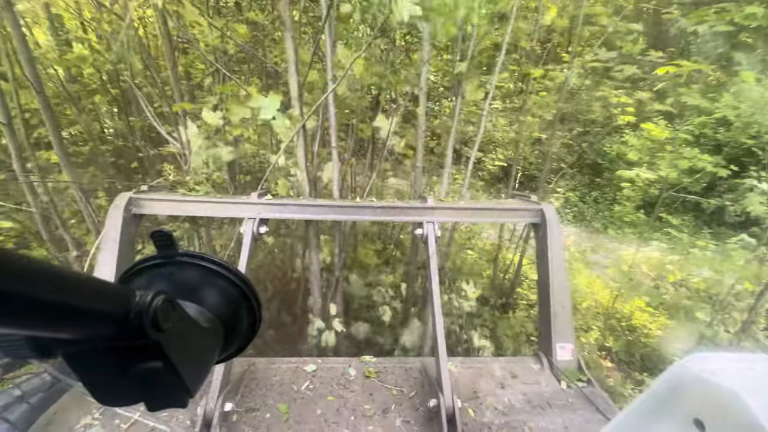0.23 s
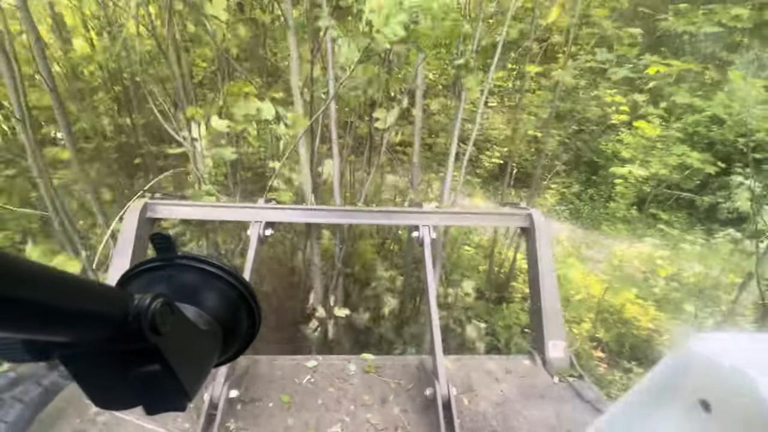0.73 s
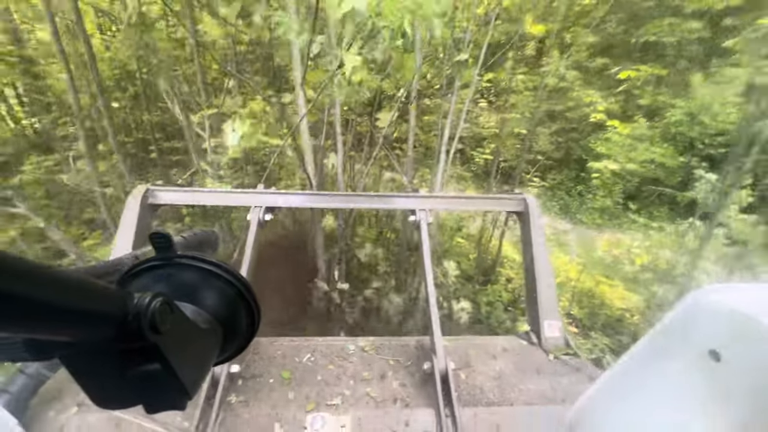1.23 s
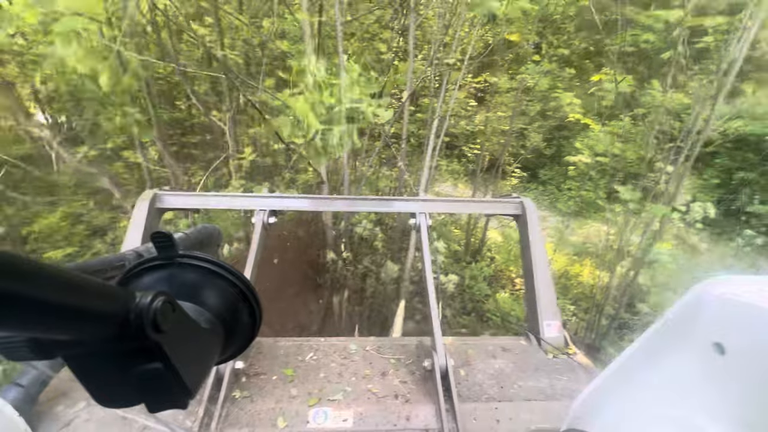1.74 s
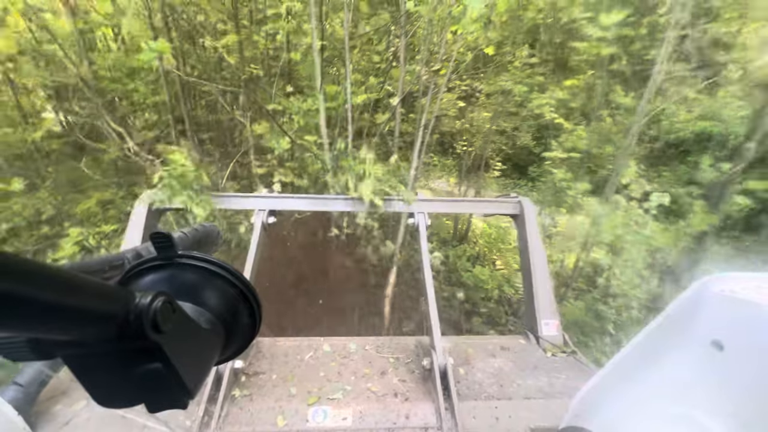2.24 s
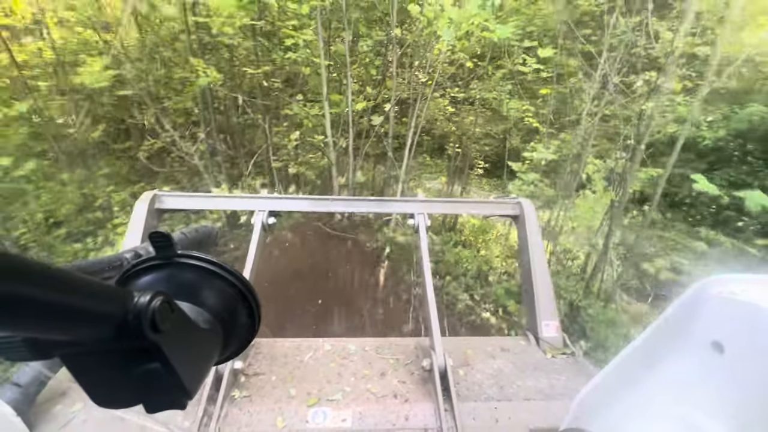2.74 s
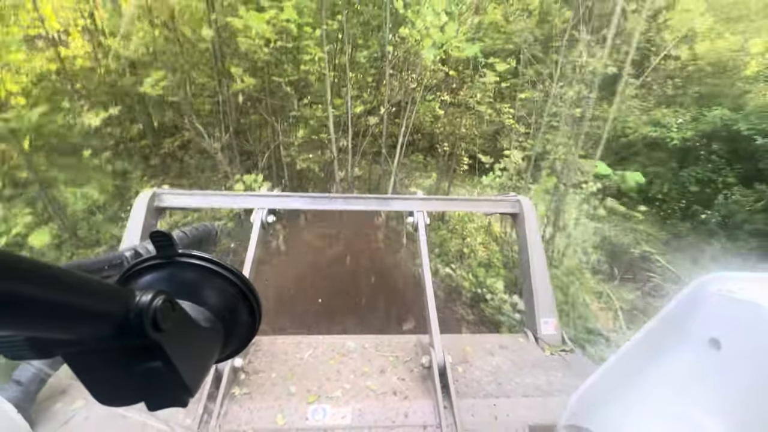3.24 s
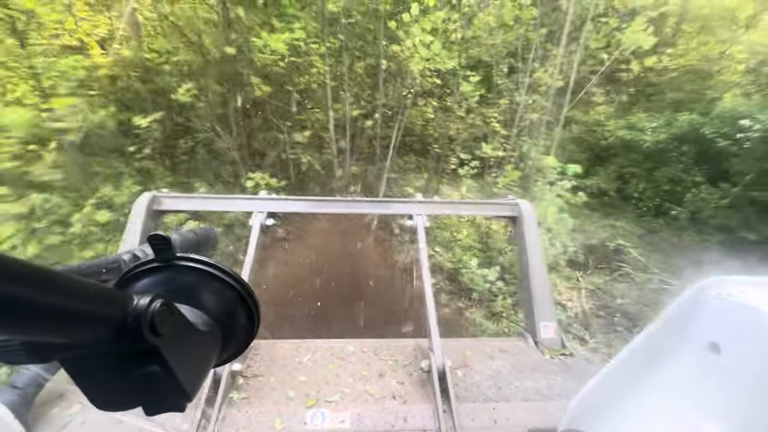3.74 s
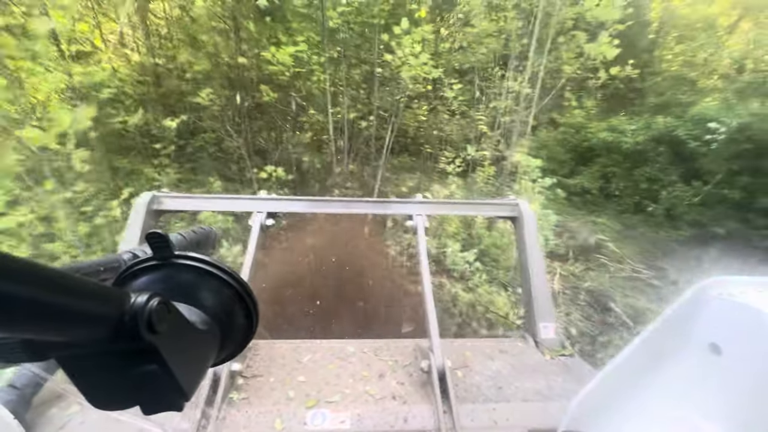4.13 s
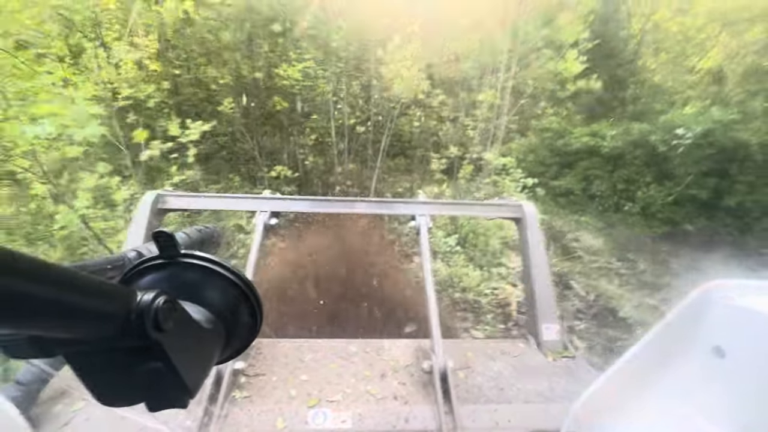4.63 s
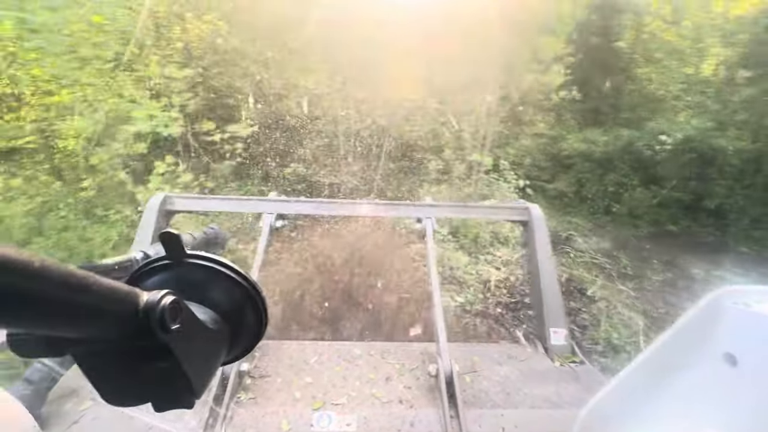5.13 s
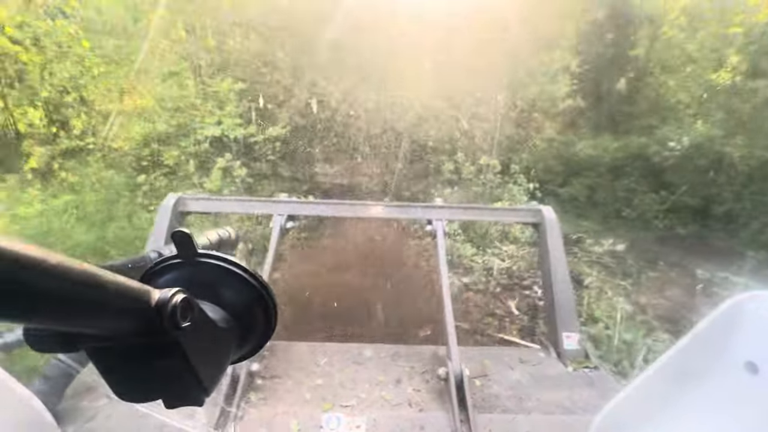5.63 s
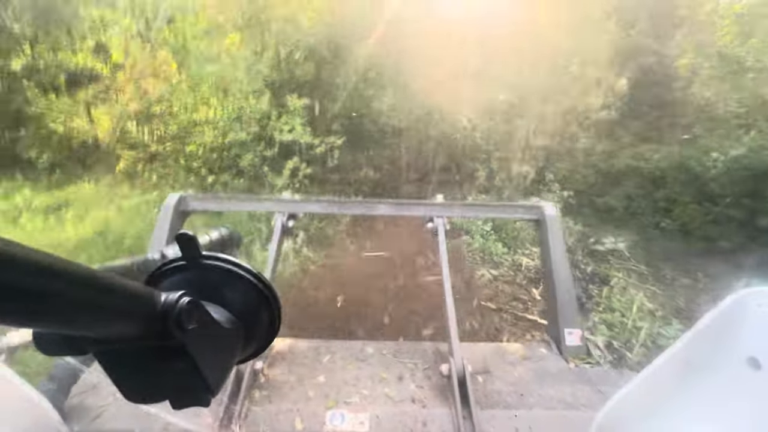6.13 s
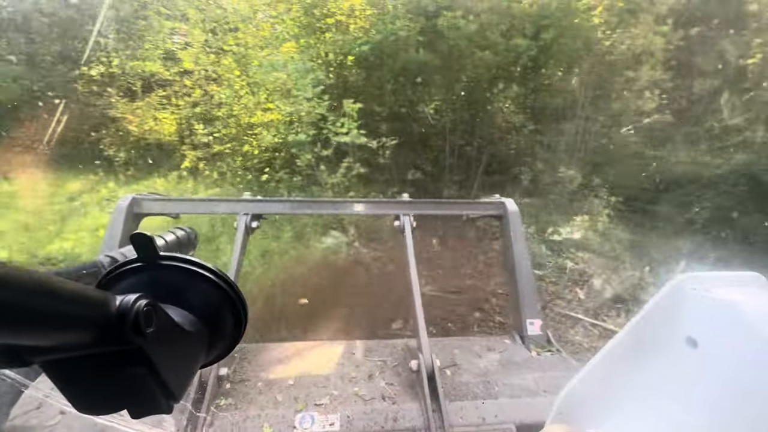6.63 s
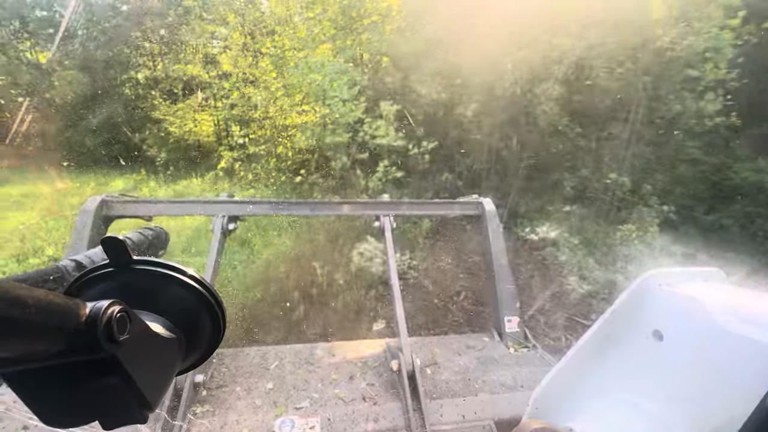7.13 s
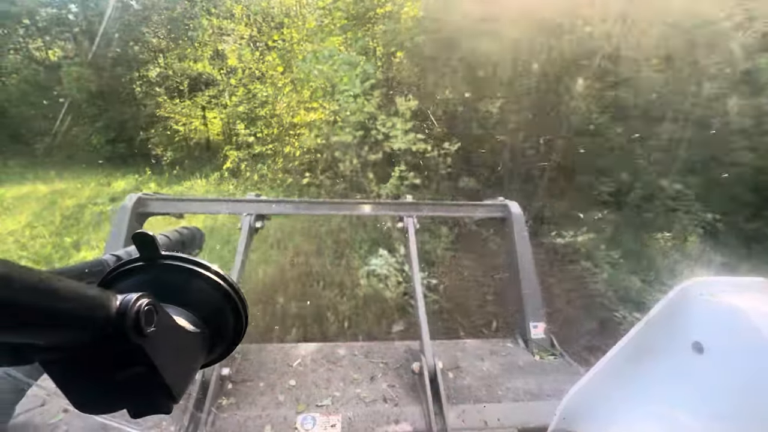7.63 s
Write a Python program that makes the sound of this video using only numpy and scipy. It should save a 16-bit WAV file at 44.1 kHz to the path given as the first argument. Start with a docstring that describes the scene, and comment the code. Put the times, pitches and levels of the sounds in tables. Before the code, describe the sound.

A brush mulcher heard from the cab: stems snap, the drum's loud howl bogs down and climbs again over engine drone, boom and pattering chips.

```python
"""In the cab of a forestry mulcher: the diesel labours while the cutter drum bites into saplings, bogs down
with a falling howl and slowly regains speed. Engine, fan, pump and drum are rotating tones; shredded wood roars
and patters as filtered hails of impacts, and chunks ring the hood's panel modes. Stems crack and a leafy branch
swishes past as noise bursts; blows on the frame are damped modes and the cab booms."""
import sys
import numpy as np
from scipy import signal
from scipy.fft import rfft, irfft, next_fast_len
from scipy.io import wavfile
from scipy.ndimage import uniform_filter1d, map_coordinates

SR = 44100
rng = np.random.default_rng(int(sys.argv[2]) if len(sys.argv) > 2 else 0)


def output_pcm(signal):
    """Save a mono or channel-first signal as 16-bit PCM at the path in sys.argv[1].

    Samples are clipped to [-1, 1] before scaling.
    """
    pcm = np.clip(np.atleast_2d(signal).T, -1, 1) * 32767
    wavfile.write(sys.argv[1], SR, np.round(pcm).astype(np.int16))


N = 347949


def amp(db):
    """Decibels to amplitude ratio."""
    return 10 ** (np.asarray(db) / 20)


def unit(x):
    """Normalisation to rms 1."""
    return x / np.sqrt(np.mean(x ** 2) + 1e-20)


def along(points, hz):
    """Interpolation of (frequency, value) points on a logarithmic frequency axis."""
    f, v = np.transpose(points)
    return np.interp(np.log(hz + 1), np.log(f + 1), v)


def curves(rows):
    """Linear interpolation in time: one value per sample for each column after the time."""
    s, *cols = np.transpose(rows)
    return [np.interp(np.arange(N) / SR, s, c) for c in cols]


def wobble(rate):
    """Slow random modulation: a smooth curve through this many random knots a second."""
    knots = rng.standard_normal(int(N * rate / SR) + 4)
    return map_coordinates(knots, [np.arange(N) * rate / SR])


def swell(middle, length, order=2, at=None):
    """Bell of height 1 and full width `length` at 1/e, over time or another control; high orders are flatter."""
    at = np.arange(N) / SR if at is None else at
    return np.exp(-np.abs(2 * (at - middle) / length) ** order)


def filtered(x, response):
    """Linear filtering: the spectrum of x is multiplied by a response of frequency."""
    m = next_fast_len(N + SR // 2)
    return irfft(rfft(x, m) * response(np.fft.rfftfreq(m, 1 / SR)), m)[..., :N]


def white():
    """Two uncorrelated white noises."""
    return rng.standard_normal((2, N))


def impacts(rate, spread_db):
    """Random impact trains: two independent hails of blows, uneven in size, at this many a second."""
    chance = rng.random((2, N))
    size = rng.exponential(size=(2, N))
    sign = np.sign(white())
    return unit((chance < rate / SR) * sign * amp(spread_db * np.minimum(size, 4)))


# interchannel coherence: frequency_hz, left_right_likeness [-1 to 1]
COHERENCE = [(40, 0.89), (170, 0.77), (215, -0.2), (290, -0.68), (340, 0.53), (450, 0.79), (540, -0.36),
             (1500, -0.14), (2800, -0.35), (4000, 0.23), (9000, -0.33), (11000, 0.28)]
# interchannel level difference: frequency_hz, left_minus_right_db
BALANCE = [(50, -1), (100, -9.5), (150, -7), (250, -3.5), (420, -7.5), (560, -2.5), (900, -2.5), (1280, -8),
           (1600, -5.5), (4400, -4.5), (5500, -14), (6400, -12.5), (8600, -0.5)]


def coloured(pair, spectrum):
    """Spectral shaping with frequency-dependent stereo coherence and balance; the middle has rms 1."""
    def turn(hz):
        return np.arccos(np.clip(along(COHERENCE, hz), -1, 1)) / 2

    mid, side = filtered(pair, lambda hz: amp(along(spectrum, hz)) * [np.cos(turn(hz)), np.sin(turn(hz))])
    ears = np.array([mid + side, mid - side])
    both = filtered(ears, lambda hz: amp(np.outer([1, -1], along(BALANCE, hz)) / 2))
    return both / np.std(both.mean(axis=0))


def sustained(pair, span):
    """Level equalisation: noise is divided by its own short-term rms over this many seconds."""
    window = signal.windows.hann(int(span * SR))
    power = signal.fftconvolve(pair.mean(axis=0) ** 2, window / window.sum(), mode="same")
    return pair / np.sqrt(np.abs(power) + 0.035)


def angle(hz):
    """Phase as the running integral of frequency."""
    return 2 * np.pi * np.cumsum(hz) / SR


def tone(phase, flutter_db, rough, lean_db, shift=0):
    """Amplitude and phase modulation of a stereo sine near rms 1; rough and shift are in radians."""
    sway = amp(flutter_db * wobble(14))
    ears = [sway * np.sin(phase + offset + rough * wobble(45)) for offset in (0, shift)]
    return np.sqrt(2) * np.array(ears) * amp([[lean_db / 2], [-lean_db / 2]])


# steady whines in the cab: pitch_hz, level_db at the start, fade_db_per_s (negative grows)
WHINE_TONES = [(654.2, -45, -0.5), (743, -48, -0.5), (1514, -65, -0.5), (2614, -57, 3.0)]


def whines():
    """Steady sinusoids whose pitch and level waver slightly."""
    out = 0
    for hz, db, fade in WHINE_TONES:
        level = amp(db - fade * np.arange(N) / SR)
        phase = angle(hz * (1 + 0.002 * wobble(.6)))
        out = out + level * tone(phase, flutter_db=1.0, rough=.14, lean_db=-11.0, shift=-1.66)
    return out


# the cooling fan's blade tone: time_s, pitch_hz, relative_level_db
FAN_TONE = [(0, 272, -29), (.7, 285, -37), (1.1, 288, -33.5), (2.4, 283, -34), (3.3, 273, -34.5),
            (3.8, 271, -38.5), (5, 274, -43), (6.7, 277, -41), (7.4, 274, -30), (7.89, 286, -27.5)]


def fan():
    """Blade-passing tone: a sine at the fan's changing blade rate."""
    fan_hz, fan_db = curves(FAN_TONE)
    return amp(fan_db - 1.5) * tone(angle(fan_hz), flutter_db=1.5, rough=.13, lean_db=-9.0, shift=0.76)


def pump(drum_hz):
    """Rotational hum of the hydraulic pump and one overtone; it sags a little with the drum."""
    # 272.2 Hz when bogged down, plus 0.145 Hz per Hz of the howl; the hum is louder at speed
    gain_hz = .145 * (drum_hz - drum_hz.min())
    phase = angle(272.2 + gain_hz)
    hum = amp(-37.5 + 0.21 * gain_hz) * tone(phase, flutter_db=4.0, rough=0.17, lean_db=-4.5, shift=-2.88)
    return hum + amp(-47.0) * tone(2 * phase, flutter_db=-1.0, rough=.14, lean_db=1.5, shift=-1.9)


# shudder of the cab on its mounts: time_s, level_db
MOUNT_SHUDDER = [(0, -44), (.4, -25), (.75, -42), (2.9, -47.5), (3.25, -35.5), (4.4, -28), (4.75, -39),
                 (5.2, -29), (7.89, -37)]


def shudder():
    """Low-frequency vibration of the cab on its mounts, a rough tone wandering around 39 Hz."""
    shudder_db, = curves(MOUNT_SHUDDER)
    mount_hz = 39 + 1.79 * wobble(2.4)
    return amp(shudder_db) * tone(angle(mount_hz), flutter_db=-3.5, rough=0.94, lean_db=-3.0, shift=0.38)


# jolts that shake the cab floor: middle_s, length_s, relative_level_db
FLOOR_JOLTS = [(0.073, 0.08, -25), (0.438, 0.3, -23), (0.943, 0.11, -21.5), (1.172, 0.088, -37),
               (1.38, 0.21, -36), (1.842, 0.15, -23.5), (2.287, 0.06, -16), (2.471, 0.11, -22.5),
               (3.26, 0.11, -22.5), (3.449, 0.27, -33), (3.718, 0.19, -23), (3.942, 0.11, -21),
               (4.42, 0.25, -32), (5.13, 0.3, -27), (5.619, 0.096, -35), (6.631, 0.083, -25),
               (7.147, 0.067, -16), (7.374, 0.04, -20), (7.47, 0.17, -22.5), (7.61, 0.05, -30.5),
               (7.755, 0.31, -26)]
# low rumble filter: frequency_hz, gain_db
RUMBLE_SPECTRUM = [(15, -36), (26, -12.5), (40, -7), (50, 2.5), (64, 3), (80, 0), (95, -1.5), (112, -10.5),
                   (135, -3), (200, -13), (400, -83.5), (1000, -120)]


def rumble():
    """Broadband excitation of the floor: low noise at -27.5 dB that swells with every jolt."""
    jolts = sum(amp(db) * swell(s, length) for s, length, db in FLOOR_JOLTS)
    level = np.hypot(amp(-27.5), amp(-2.0) * jolts)
    return level * sustained(coloured(white(), RUMBLE_SPECTRUM), span=0.05)


# pulses of cab boom as the machine bucks: middle_s, length_s, relative_level_db, pitch_hz
BOOM_PULSES = [(0.085, 0.081, -25.5, 160.8), (0.18, 0.064, -23, 157), (0.398, 0.25, -21.5, 161.1),
               (0.643, 0.22, -22, 155), (0.855, 0.11, -25, 151.8), (0.943, 0.052, -21, 153.1),
               (1.032, 0.059, -31, 161.4), (1.185, 0.21, -28.5, 157.1), (1.373, 0.071, -26, 157.8),
               (1.5, 0.076, -26, 161), (1.595, 0.039, -23.5, 162), (1.707, 0.07, -23, 155.5),
               (1.799, 0.084, -33, 158), (2.019, 0.078, -22.5, 164.6), (2.195, 0.027, -24, 157.8),
               (2.271, 0.057, -21, 159.4), (2.386, 0.074, -23, 156.5), (2.6, 0.094, -28, 157),
               (2.962, 0.35, -22.5, 161.2), (3.29, 0.31, -26.5, 149.2), (3.454, 0.061, -27, 163),
               (3.554, 0.037, -28.5, 164), (3.718, 0.14, -31.5, 169.3), (3.809, 0.025, -26, 169),
               (3.896, 0.05, -23, 167), (3.998, 0.054, -19.5, 159.2), (4.127, 0.12, -25, 165),
               (4.255, 0.058, -28.5, 168.4), (4.389, 0.061, -22, 155.7), (4.604, 0.079, -23, 157.3),
               (4.713, 0.034, -26, 162.3), (4.876, 0.19, -28.5, 157.7), (5.126, 0.042, -26, 159.5),
               (5.332, 0.055, -23.5, 159.5), (5.421, 0.071, -22, 159.7), (5.561, 0.059, -28.5, 152.9),
               (5.688, 0.15, -24, 155.6), (6.165, 0.29, -24.5, 156.7), (6.384, 0.09, -26, 159.8),
               (6.554, 0.19, -27.5, 161.7), (6.817, 0.072, -24, 165), (6.959, 0.21, -24, 158.8),
               (7.154, 0.054, -17.5, 156), (7.248, 0.11, -29, 150), (7.372, 0.21, -26.5, 156.1),
               (7.56, 0.06, -18.5, 160), (7.701, 0.21, -25, 150.6)]
# cab air filter: frequency_hz, gain_db
CAB_SPECTRUM = [(60, -65), (100, -41.5), (132, -19), (148, 1.5), (163, 10), (174, 1.5), (190, -19),
                (250, -54.5), (1000, -120)]


def boom():
    """Cavity resonance: the air in the cab booms in uneven gliding pulses over a narrow-band murmur."""
    times, _, _, pitches = np.transpose(BOOM_PULSES)
    boom_hz, = curves(np.transpose([times, pitches]))
    pulses = sum(amp(db) * swell(s, length) for s, length, db, _ in BOOM_PULSES)
    booming = pulses * tone(angle(boom_hz), flutter_db=-1.0, rough=0.33, lean_db=-9.5, shift=0.33)
    return amp(-1.2) * booming + amp(-33) * coloured(white(), CAB_SPECTRUM)


# spells in which the diesel labours: middle_s, length_s, firing_rise_db
LABOUR_SPELLS = [(1.351, 0.65, 12), (3.546, 0.94, 9.5), (4.419, 0.34, 10.5), (6.6, 3.44, 1.5)]
# other low engine orders: multiple_of_crankshaft_rate, level_db
ENGINE_ORDERS = [(3, -40), (4, -38), (5, -41.5), (7, -56)]


def diesel(crank):
    """Engine orders: tones locked to the crankshaft, the firing drone rising as the diesel labours."""
    firing_db = -38.5 + sum(db * swell(s, length, order=4) for s, length, db in LABOUR_SPELLS)
    # four cylinders fire twice a turn
    drone = amp(firing_db) * tone(2 * crank, flutter_db=-0.5, rough=0.41, lean_db=-7.0, shift=0.22)
    for k, db in ENGINE_ORDERS:
        drone += amp(db) * tone(k * crank, flutter_db=3.5, rough=0.5, lean_db=-3.0)
    return drone


def clatter(crank):
    """Periodic noise: one random waveform repeats every crankshaft turn, so its partials glide with speed."""
    turn = rng.standard_normal((2, 1024))
    place = crank / (2 * np.pi) * turn.shape[1]
    return unit(np.array([map_coordinates(side, [place], mode="grid-wrap") for side in turn]))


# heavy wood striking the frame: start_s, relative_level_db
FRAME_KNOCKS = [(0.053, 3.5), (0.355, 0), (2.266, -4), (3.94, -10), (4.344, -11), (7.128, -12), (7.537, -6)]


def knocks():
    """Damped modes: each heavy blow rocks the frame at 59 and 127 Hz with a soft onset."""
    out, t = np.zeros(N + SR), np.arange(SR // 2) / SR

    def mode(hz, t60):
        return amp(-60 * t / t60) * np.sin(2 * np.pi * hz * t) * (1 - np.exp(-t / 0.027))

    frame = .5 * mode(hz=59.0, t60=0.35) + 0.64 * mode(hz=127.0, t60=0.098)
    for s, db in FRAME_KNOCKS:
        out[round(s * SR):][:len(t)] += amp(db - 8.0) * frame
    return out[:N] * amp([[-2.5], [2.5]])


# grit pinging off the steel guard: start_s, level_db, pitch_hz
GRIT_PINGS = [(6.365, -55, 4020), (6.5784, -47, 4170)]


def grit(t60):
    """Free vibration: flung grit rings the guard as a decaying sine."""
    out, t = np.zeros(N + SR), np.arange(SR // 4) / SR
    for s, db, hz in GRIT_PINGS:
        out[round(s * SR):][:len(t)] += amp(db - 60 * t / t60) * np.sin(2 * np.pi * hz * t)
    return out[:N]


# bright swishes past the cab: middle_s, length_s, level_db
BRIGHT_SWISHES = [(.42, 0.33, -54.5), (0.927, 0.031, -42.5), (0.962, 0.079, -56)]
# swish filter: frequency_hz, gain_db
SWISH_SPECTRUM = [(2000, -20), (4500, -5), (6200, 6), (8500, -2), (11000, -5), (15500, -17)]


def swishes():
    """Friction noise and small impacts: bright crackling swishes sweep past the cab."""
    contact = sum(amp(db) * swell(s, length) for s, length, db in BRIGHT_SWISHES)
    hiss = white() + 1.1 * impacts(rate=380, spread_db=2.5)
    return contact * coloured(hiss, SWISH_SPECTRUM)


# stems snapping: start_s, relative_level_db, t60_s, tick_relative_to_snap_db
STEM_CRACKS = [(.365, -29.5, .022, -15), (.394, -32.5, .025, -20), (.401, -36, .02, -18),
               (.412, -33, .02, -13), (.4443, -27, .016, -2), (.456, -33, .018, -20), (.479, -36, .02, -13),
               (.49, -35, .02, -20), (.4975, -31.5, .016, -9), (.9165, -38, .03, -8), (.922, -32, .03, -5),
               (.93, -35, .045, -7), (.9565, -40, .015, -14), (1.121, -38, .06, -25),
               (1.512, -42, .05, -25), (1.804, -42, .05, -25), (2.062, -40, .08, -30),
               (2.104, -41, .06, -30), (4.631, -43, .05, -30), (5.011, -44, .022, 5), (5.084, -53, .05, 6),
               (5.289, -43, .05, -30), (6.24, -41, .06, -30), (6.364, -40.5, .08, -25),
               (6.578, -38, .08, -30)]
# crack body filter: frequency_hz, gain_db
SNAP_SPECTRUM = [(200, -31), (800, -23), (2500, 3.5), (4200, -1.5), (7000, -5.5), (9500, -31), (15500, -32)]
# sharp tick filter: frequency_hz, gain_db
TICK_SPECTRUM = [(2000, -22), (6000, 6), (11000, -4), (15500, -5)]


def stems():
    """Sudden fracture: decaying noise bursts, dry stems with a sharper tick."""
    bursts, t = np.zeros((2, N + SR)), np.arange(SR // 5) / SR
    for s, db, t60, tick_db in STEM_CRACKS:
        decay = amp(db - 7.0 - 60 * t / t60)
        bursts[:, round(s * SR):][:, :len(t)] += amp([[0], [tick_db]]) * decay
    snap, tick = bursts[:, :N]
    return snap * coloured(white(), SNAP_SPECTRUM) + tick * coloured(white(), TICK_SPECTRUM)


# resonances of the hood's steel panels: pitch_hz, width_hz, rise_db
PANEL_MODES = [(357, 33, 2), (451, 45, 1), (532, 50, 2), (610, 48, 1), (746, 40, 4.5), (855, 29, 4.5),
               (1055, 54, 1.5), (1262, 34, 2), (1353, 50, 2.5), (1516, 35, 3.5), (1673, 50, 5),
               (1800, 45, 2.5), (1940, 60, 4), (2220, 70, 4.5), (2445, 55, 2.5), (2543, 70, 1),
               (2990, 51, 4), (4015, 56, 4.5), (4950, 270, 1.5), (6350, 270, 3)]


def ringing(pair):
    """Modal response: the hood's panels lift their own resonances out of whatever strikes them."""
    def lift(hz):
        return amp(sum(db * swell(centre, width, at=hz) for centre, width, db in PANEL_MODES))

    return filtered(pair, lift)


# wood flung against the hood: start_s, relative_level_db, pitch_hz around which the panels answer
WOOD_CHUNKS = [(.367, -28, 900), (.388, -17, 380), (.416, -25, 800), (.48, -17, 460), (.612, -24, 520),
               (.926, -31, 900), (0.973, -22, 460), (1.657, -37, 1600), (2.288, -26, 850),
               (2.985, -29, 900), (2.996, -36, 1400), (3.653, -34, 1500), (4.013, -29, 1000),
               (4.58, -30, 850), (4.633, -34, 1500), (5.33, -18, 460), (5.407, -28, 850), (5.648, -18, 500),
               (6.14, -15, 460), (6.424, -16, 460), (6.727, -18, 560), (7.247, -38, 1400), (7.42, -25, 850),
               (7.562, -20, 400), (7.587, -30, 800)]


def chunks():
    """Modal synthesis: each chunk rings the panel modes near its pitch; heavy ones thud, light ones clack."""
    out, t = np.zeros((2, N + SR)), np.arange(SR // 5) / SR
    hz, width, _ = np.transpose(PANEL_MODES)[:, :, None]
    for s, db, pitch_hz in WOOD_CHUNKS:
        octaves = np.log2(hz / pitch_hz)
        weight = swell(0, 0.79, at=octaves) * amp(rng.normal(0, 2, hz.shape))
        weight /= np.linalg.norm(weight)
        phase = rng.uniform(0, 2 * np.pi, hz.shape) + rng.normal(0, 0.52, (2, *hz.shape))
        # a wider resonance dies away sooner
        modes = weight * np.exp(-np.pi * width * t) * np.sin(2 * np.pi * hz * t + phase)
        onset = 1 - np.exp(-t / .001)
        out[:, round(s * SR):][:, :len(t)] += amp(db - 1.0) * modes.sum(axis=1) * onset
    return out[:, :N] * amp([[2.5], [-2.5]])


def churned(pair):
    """Uneven modal excitation: the tumbling load lifts the ringing panels in short shifting patches."""
    z = signal.stft(ringing(pair), SR, nperseg=2048)[2]
    field = uniform_filter1d(rng.standard_normal(z.shape[1:]), size=3, axis=0)
    field = unit(uniform_filter1d(field, size=4, axis=1))
    # patches of 1 dB rms over frequency and time
    return signal.istft(z * amp(1.0 * field), SR, nperseg=2048)[1][:, :N]


# work of the cutter head: time_s, relative_rattle_db, relative_spray_db
HEAD_WORK = [(0.03, -40, -50), (0.42, -38.5, -49), (0.6, -38.5, -51), (0.64, -40, -51), (1.42, -41, -53),
             (1.64, -40, -50), (1.79, -41, -52), (2.12, -40.5, -51), (2.77, -40.5, -53.5),
             (4.19, -41, -54.5), (7.54, -38, -53.5), (7.85, -38.5, -53.5)]


def work():
    """Source strength over time: chip rattle and fine spray in dB."""
    return curves(HEAD_WORK)


def tearing():
    """Load-dependent unsteadiness: a factor that grows with the spray of chips."""
    _, spray_db = work()
    return amp(2.0 * (spray_db - spray_db.mean()))


# the teeth biting into thicker wood: middle_s, roar_rise_db
THICK_BITES = [(.38, 3), (.48, 3), (.57, -1), (.64, 0), (4.8, 2), (5.42, 2), (5.89, 1.5), (6.04, 2),
               (6.43, 2), (7.08, 1), (7.319, 2), (7.46, 0)]


def bites():
    """Transient loading: brief swells in dB as the teeth meet thicker wood."""
    return sum(db * swell(s, 0.035) for s, db in THICK_BITES)


# shredding roar filter: frequency_hz, gain_db
ROAR_SPECTRUM = [(120, -26.5), (190, -2), (225, 1), (300, 0), (350, -0.5), (460, 0.5), (540, -1.5),
                 (620, -2.5), (680, -11.5), (780, -7), (900, -15), (1300, -45), (5000, -120)]


def roar():
    """Dense impact noise: wood hails on the ringing hood, surging with the work and the bites."""
    rattle_db, _ = work()
    # -28.5 dB at average work, 0.92 dB per dB of rattle
    roar_db = -28.5 + 0.92 * (rattle_db - rattle_db.mean()) + bites()
    return amp(roar_db) * coloured(churned(impacts(rate=2500, spread_db=2.0)), ROAR_SPECTRUM)


# chip rattle filter: frequency_hz, gain_db
RATTLE_SPECTRUM = [(500, -22.5), (850, -8), (1000, 1.5), (1280, 0), (1400, -3), (1620, -2.5), (1850, -10),
                   (2250, -9.5), (2600, -9), (2850, -13), (3200, -17), (4500, -30), (10000, -100)]


def rattle(crank):
    """Impact noise over periodic noise: chips patter in the hood over the engine's clatter."""
    clatter_share = .22  # of the power going in
    blows = np.sqrt(1 - clatter_share) * impacts(rate=5000, spread_db=1.5)
    blows += np.sqrt(clatter_share) * clatter(crank)
    rattle_db, _ = work()
    level_db = rattle_db - 1.0 + 0.36 * bites() + 0.39 * wobble(25)
    return amp(level_db) * coloured(churned(blows), RATTLE_SPECTRUM)


# fine spray filter: frequency_hz, gain_db
SPRAY_SPECTRUM = [(1500, -28.5), (3000, 5), (3900, 3.5), (4500, 1.5), (5300, 0), (6400, -2), (7300, -1.5),
                  (8600, -6), (9500, -20), (11500, -13), (13000, -41), (15500, -16.5)]


def spray(crank):
    """Amplitude-modulated hiss of fine chips, throbbing once per turn of the crankshaft."""
    _, spray_db = work()
    throb = 1 + 0.063 * np.cos(crank)
    chips = white() + 0.57 * impacts(rate=1600, spread_db=1.5)
    return amp(spray_db) * throb * coloured(ringing(chips), SPRAY_SPECTRUM)


# whines flaring as the load shifts: middle_s, length_s, multiple_of_howl, level_db
ORDER_FLARES = [(.13, 0.14, 1, -34), (0.137, 0.31, 2, -45), (.33, .12, 1, -40), (0.302, 0.6, 5, -66),
                (.33, 0.2, 2, -44.5), (.55, 0.19, 5.4, -59), (0.572, 0.083, 2, -42),
                (0.576, 0.098, 1.8, -47), (0.622, 0.086, 2.7, -45), (0.626, 0.14, 1, -28),
                (1, 0.14, 1, -33), (.75, .05, 2.7, -45.5), (.76, 0.23, 5.4, -58), (.88, 0.14, 3, -44),
                (0.96, 0.28, 1.8, -41.5), (1.02, 0.13, 5.4, -62), (1.04, 0.13, 2.7, -45.5),
                (1.26, 0.12, 1.8, -40), (1.33, 0.17, 3, -54), (1.651, 0.17, 3, -56), (1.75, 0.5, 5.6, -59),
                (2.015, 0.62, 2, -44), (2.698, .4, 2, -51.5), (2.36, .35, 5.8, -58), (2.554, 1, 3, -49.5),
                (3.1, 0.53, 2, -45), (3.2, .3, 5.8, -59), (3.45, .3, 1.8, -51.5), (3.7, 0.59, 2, -49.5),
                (3.75, .6, 6.3, -63), (3.8, .25, 5.8, -63.5), (3.95, .2, 1.8, -49), (4.718, 0.27, 3, -49),
                (4.92, 0.42, 2, -47.5), (5.1, .5, 5.6, -56.5), (5.3, .3, 5.4, -59), (5.42, 0.24, 2.7, -51),
                (5.68, 0.7, 2, -45.5), (5.832, 0.16, 2.7, -56), (5.8, 0.75, 1, -35.5), (6.451, .35, 1, -39),
                (6.3, .2, 1.8, -41), (6.42, .3, 5.4, -60), (6.498, 0.8, 3, -47), (6.5, .55, 6.3, -62.5),
                (6.62, 0.6, 4, -62), (6.642, 0.42, 1.8, -38), (6.85, 0.21, 3, -52), (7.47, 0.6, 3, -42.5),
                (7.6, .4, 5.8, -67)]


def flares(hz):
    """Transient orders of drum and gears: short rough whines, wavering most while the teeth tear."""
    phase = angle(hz * (1 + .0016 * tearing() * wobble(13)))
    orders = {}
    for k in sorted({row[2] for row in ORDER_FLARES}):
        orders[k] = tone(k * phase, flutter_db=1.3, rough=.16, lean_db=-9.5, shift=0.59)
    return sum(amp(db) * swell(s, length, order=2.5) * orders[k] for s, length, k, db in ORDER_FLARES)


# lasting weak overtones of teeth and gears: multiple_of_howl, level_db
DRIVE_ORDERS = [(.9, -41.5), (1.8, -55.5), (2, -50), (2.7, -62.5), (3, -60.5), (3.6, -67), (4, -63.5),
                (5.4, -67), (5.8, -66.5), (6.3, -68.5)]


def overtones(hz):
    """Harmonic and gear orders of the drum, ragged in a thick spray of chips."""
    phase, ragged = angle(hz), 0.19 * tearing()
    return sum(amp(db) * tone(k * phase, flutter_db=2.0, rough=ragged, lean_db=-7.5, shift=1.78)
               for k, db in DRIVE_ORDERS)


# main resonances of the hood: pitch_hz, width_hz, rise_db, in_step_share [0-1, alike at both ears]
HOOD_RESONANCES = [(415.1, 45.3, 15.5, 1), (514, 23, 8.5, 0)]


def howl(hz):
    """Tooth-passing tone: faint and rough until a main hood resonance lets it ring loud and clean."""
    near = np.array([swell(centre, width, order=3, at=hz) for centre, width, _, _ in HOOD_RESONANCES])
    _, _, rise_db, in_step = np.transpose(HOOD_RESONANCES)
    loose = 1 - near.sum(axis=0)
    rough = 0.063 + 0.3 * loose + .12 * bites()
    # phase between the ears, in radians
    shift = -1.9 * (1 - 1.02 * in_step @ near)
    level = amp(-38.5 + rise_db @ near + 0.85 * bites())
    return level * tone(angle(hz), flutter_db=2.0 * loose, rough=rough, lean_db=-9.0, shift=shift)


# cutter teeth as the drum bogs down and recovers: time_s, pitch_hz
DRUM_PITCH = [(0, 526), (.53, 531), (.8, 490), (1.25, 455), (1.5, 439), (1.7, 433), (2, 417), (2.5, 412),
              (2.9, 416), (3.3, 426), (4, 432), (5, 447), (6, 470), (6.4, 489), (6.7, 486), (7, 498),
              (7.4, 484), (7.89, 491)]


def scene():
    """Superposition of all sources; the engine sags and recovers with the drum it drives."""
    drum_hz, = curves(DRUM_PITCH)
    crank = angle(.075 * drum_hz)  # crankshaft turns per cycle of the howl
    cab = whines() + fan() + pump(drum_hz) + shudder() + rumble() + boom() + diesel(crank)
    wood = knocks() + grit(t60=0.18) + swishes() + stems() + chunks()
    shredding = roar() + rattle(crank) + spray(crank)
    return cab + wood + shredding + flares(drum_hz) + overtones(drum_hz) + howl(drum_hz)


def record(dry):
    """Band limitation: a steep elliptic low-pass at 15.8 kHz."""
    return signal.sosfilt(signal.ellip(10, .1, 90, 15800, fs=SR, output="sos"), dry)


dry = scene()
out = record(dry)
output_pcm(out)
```